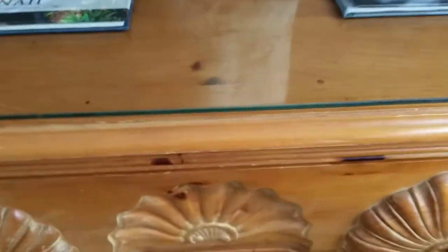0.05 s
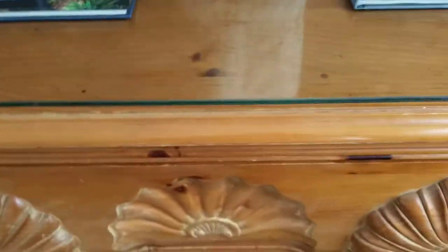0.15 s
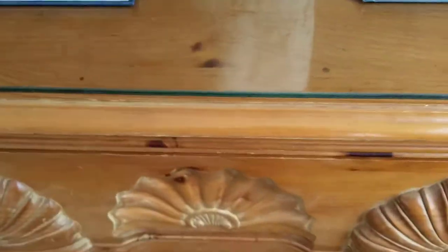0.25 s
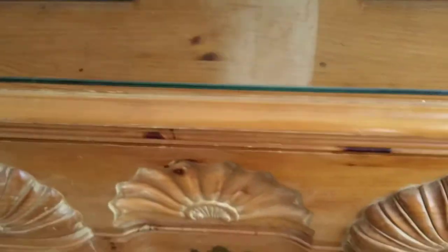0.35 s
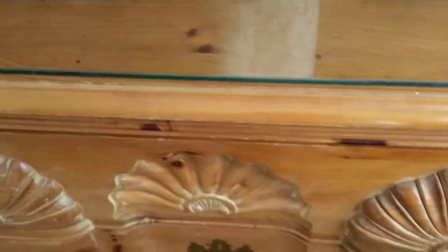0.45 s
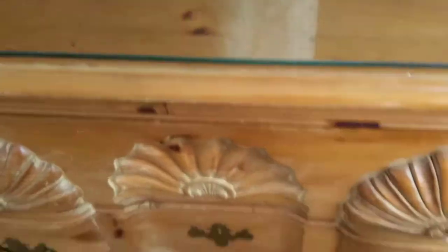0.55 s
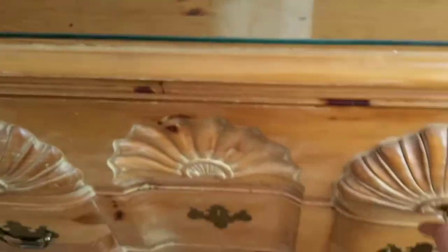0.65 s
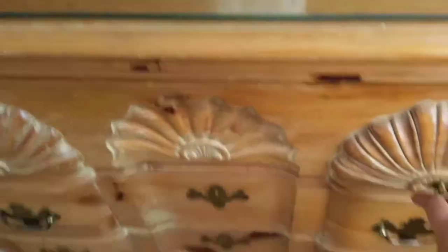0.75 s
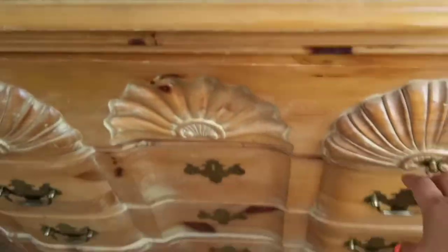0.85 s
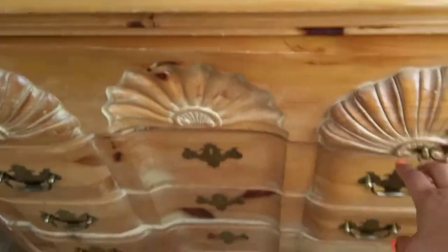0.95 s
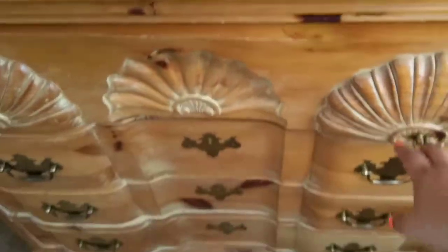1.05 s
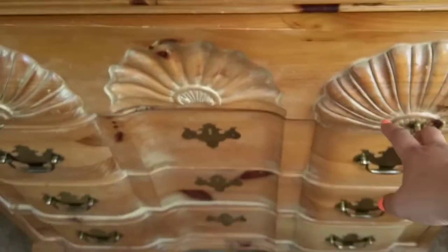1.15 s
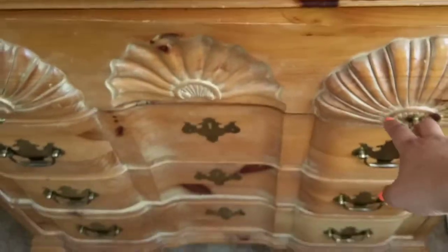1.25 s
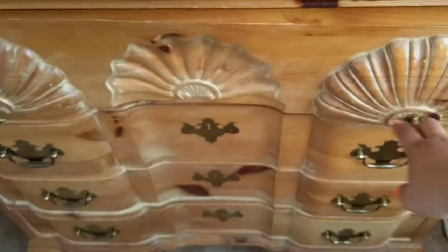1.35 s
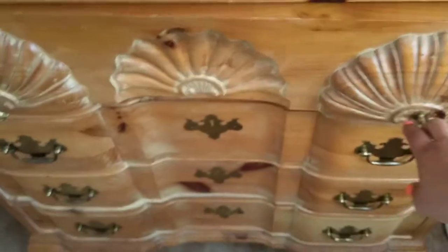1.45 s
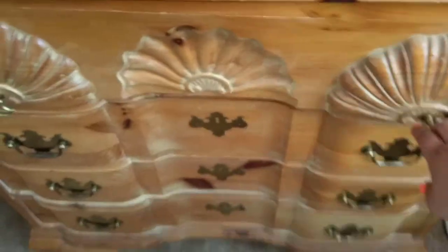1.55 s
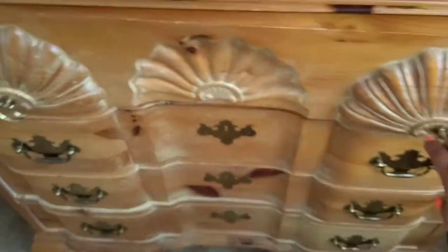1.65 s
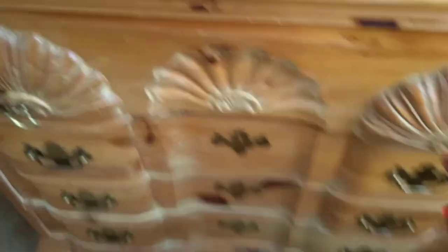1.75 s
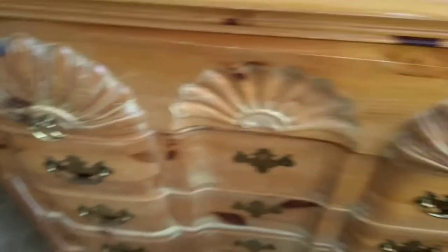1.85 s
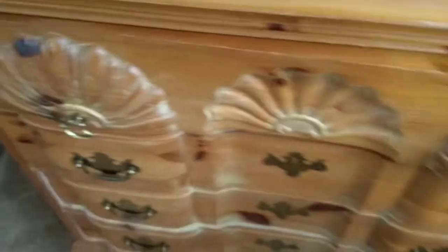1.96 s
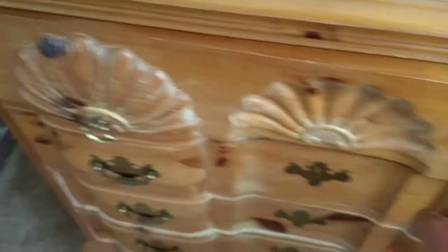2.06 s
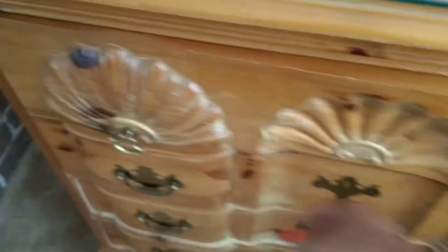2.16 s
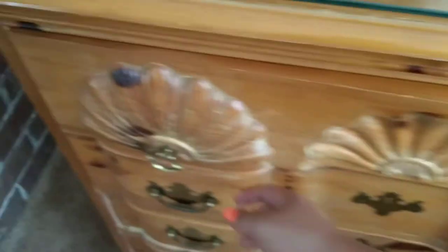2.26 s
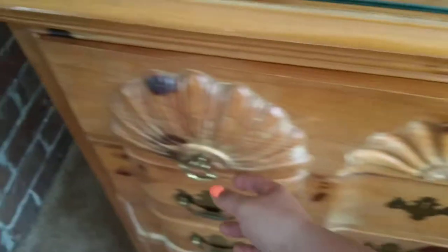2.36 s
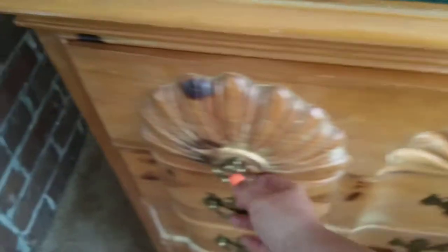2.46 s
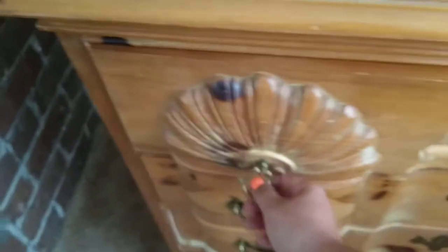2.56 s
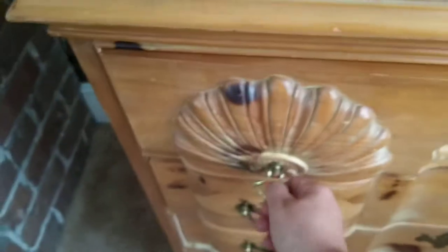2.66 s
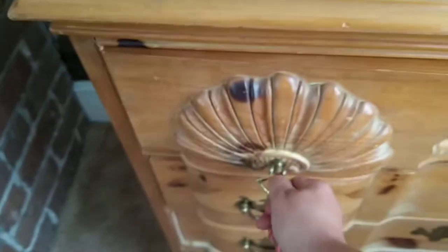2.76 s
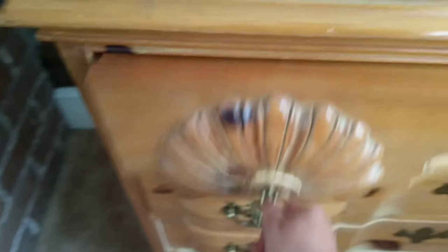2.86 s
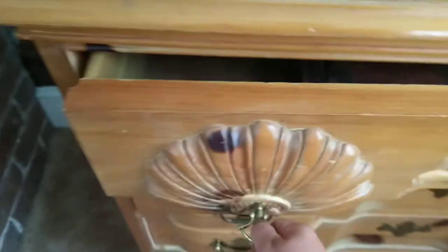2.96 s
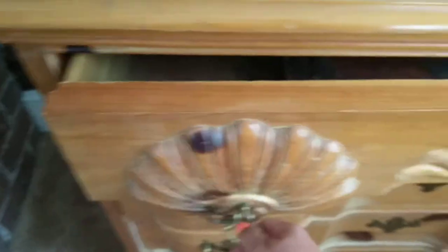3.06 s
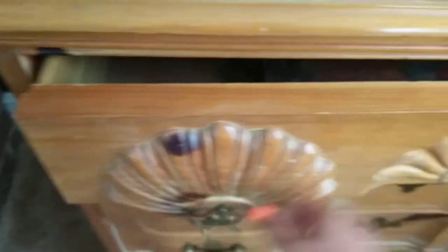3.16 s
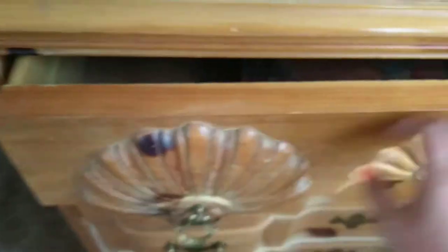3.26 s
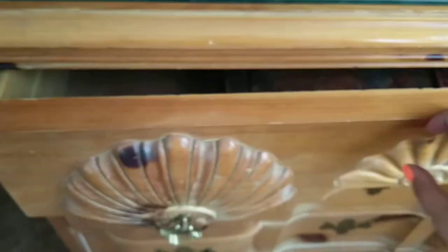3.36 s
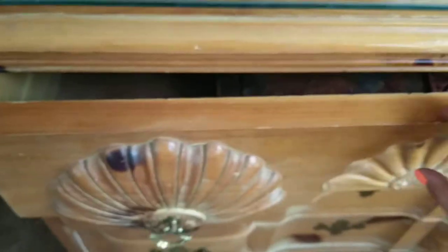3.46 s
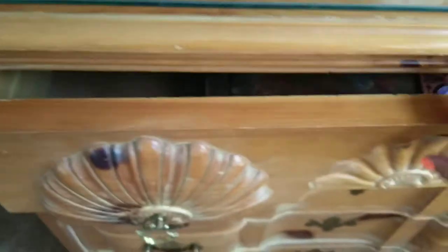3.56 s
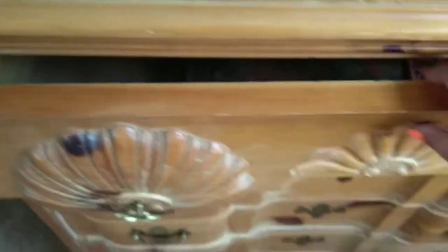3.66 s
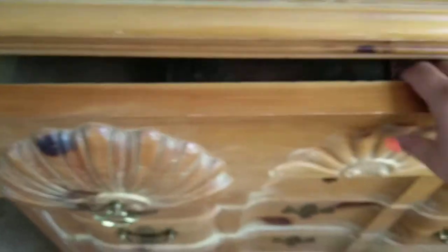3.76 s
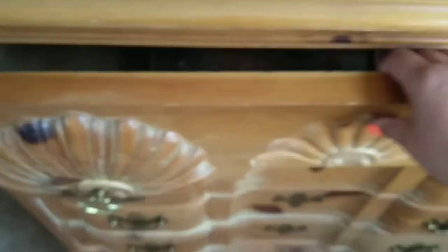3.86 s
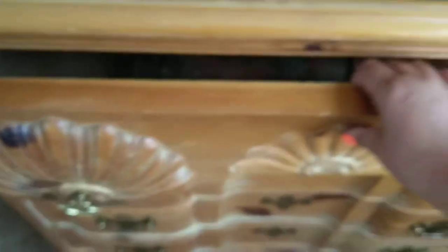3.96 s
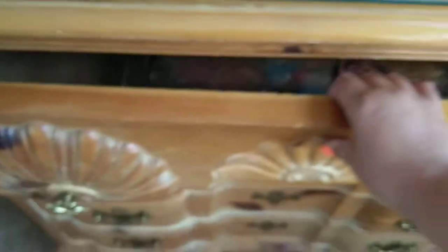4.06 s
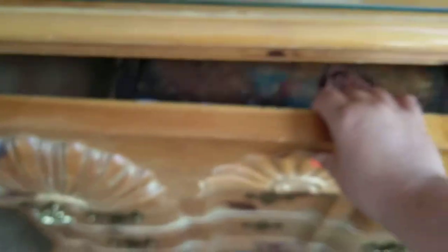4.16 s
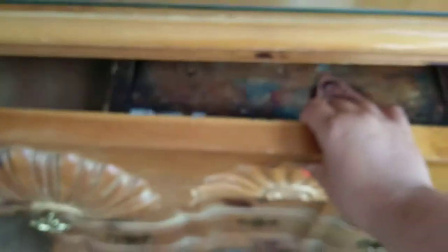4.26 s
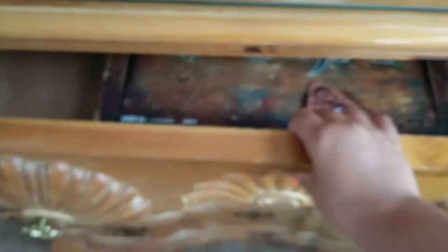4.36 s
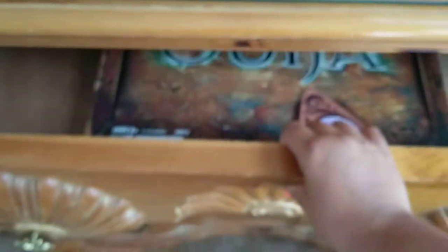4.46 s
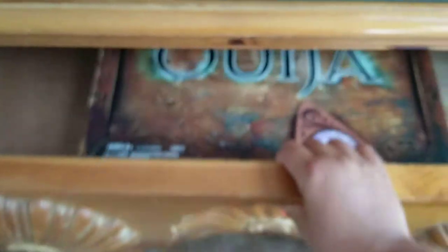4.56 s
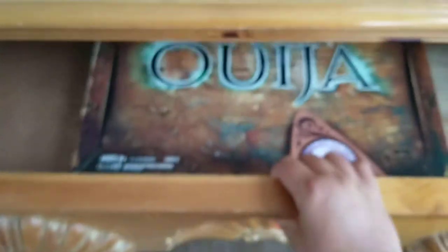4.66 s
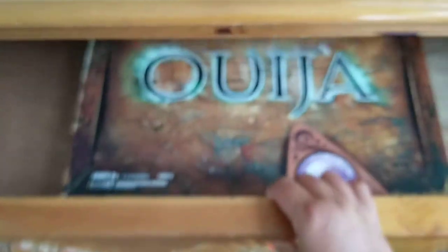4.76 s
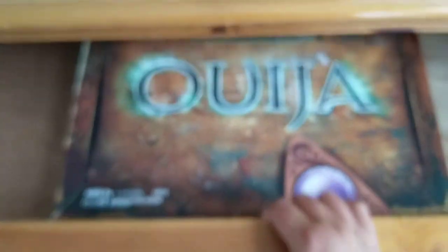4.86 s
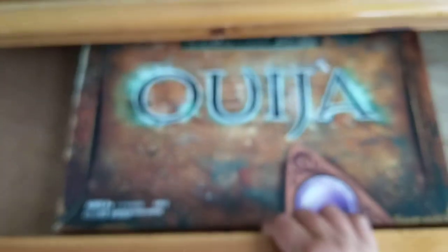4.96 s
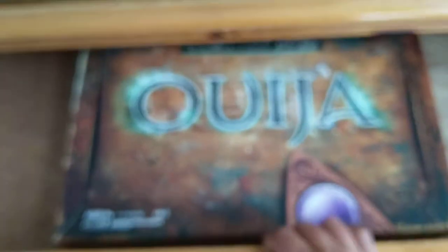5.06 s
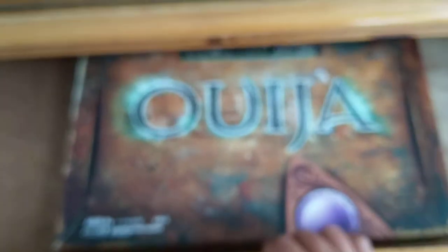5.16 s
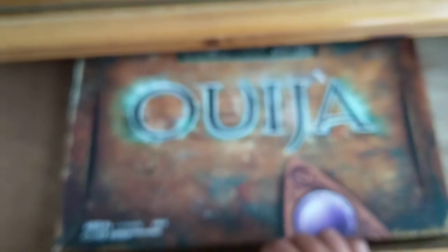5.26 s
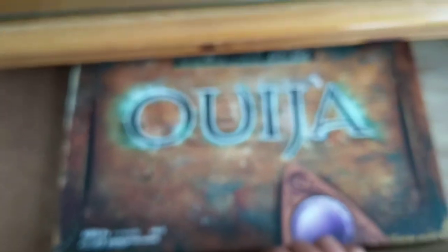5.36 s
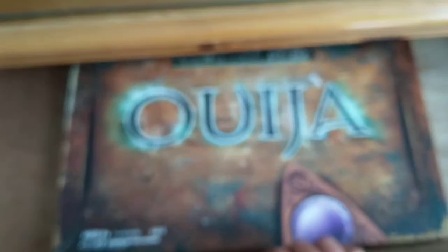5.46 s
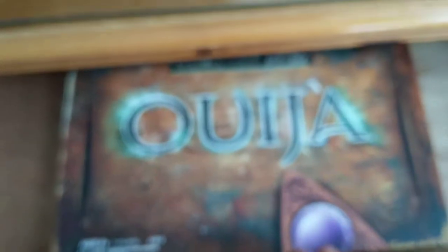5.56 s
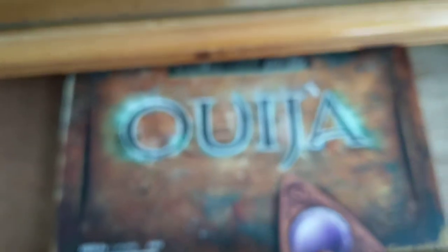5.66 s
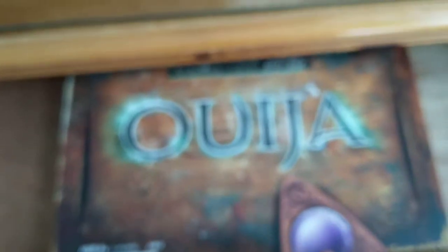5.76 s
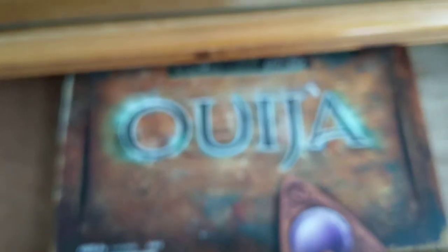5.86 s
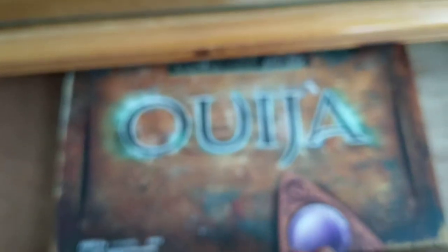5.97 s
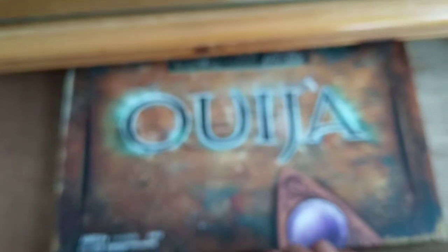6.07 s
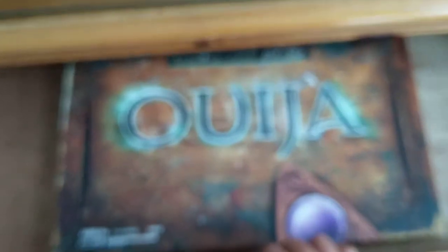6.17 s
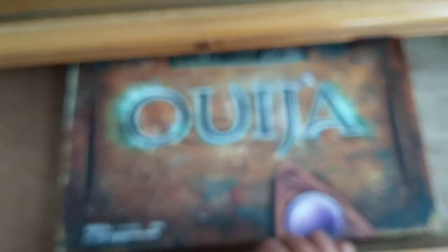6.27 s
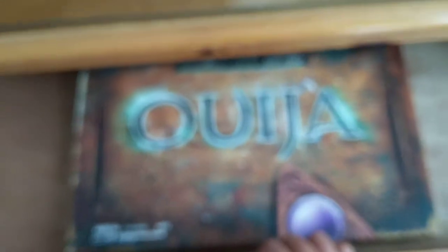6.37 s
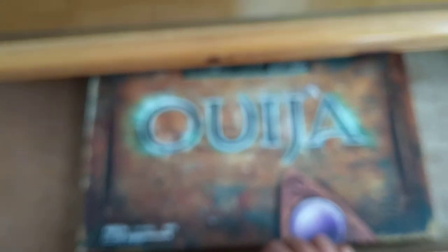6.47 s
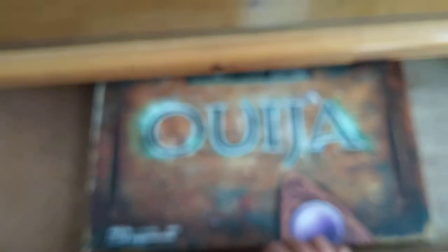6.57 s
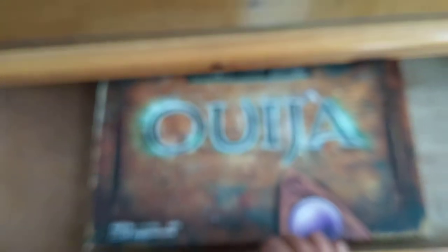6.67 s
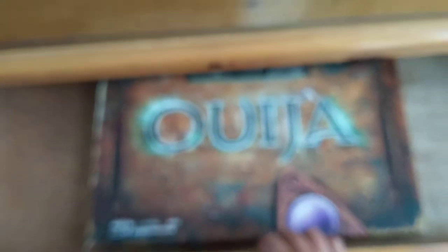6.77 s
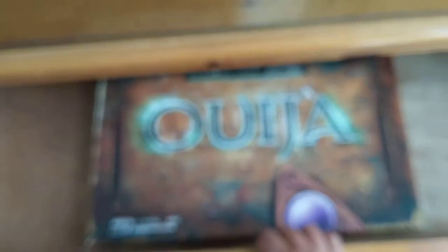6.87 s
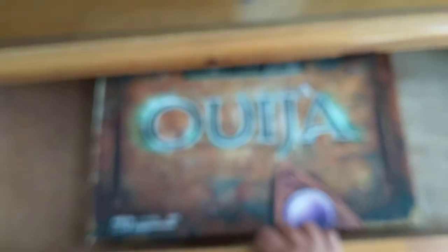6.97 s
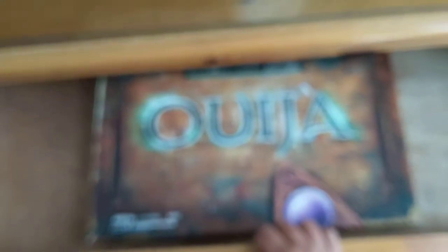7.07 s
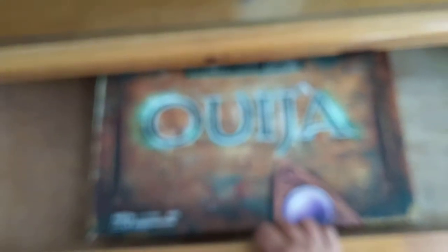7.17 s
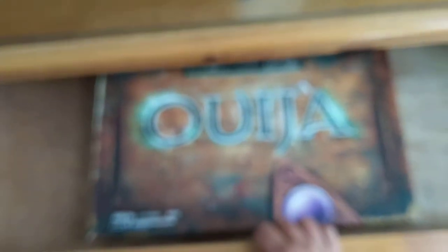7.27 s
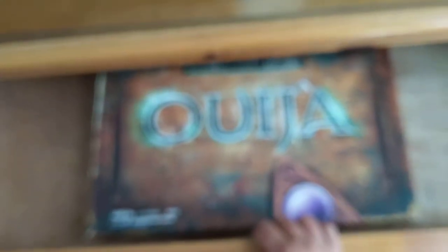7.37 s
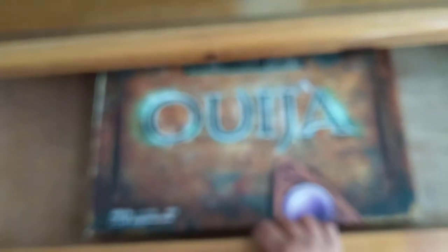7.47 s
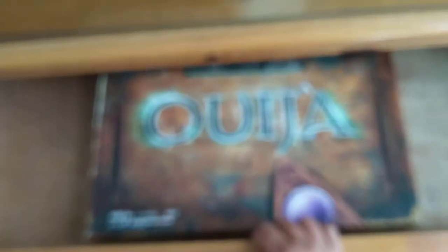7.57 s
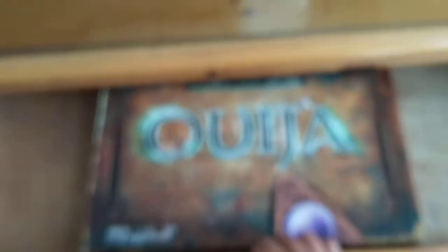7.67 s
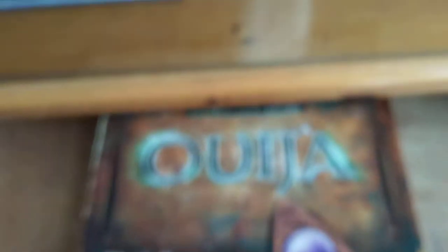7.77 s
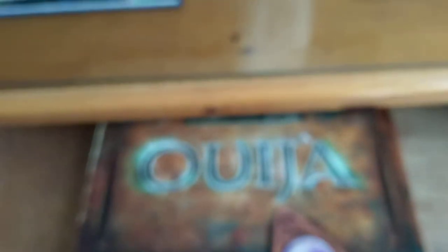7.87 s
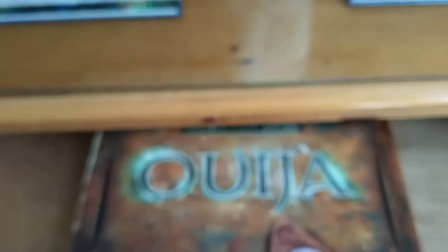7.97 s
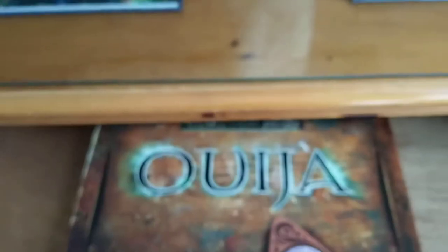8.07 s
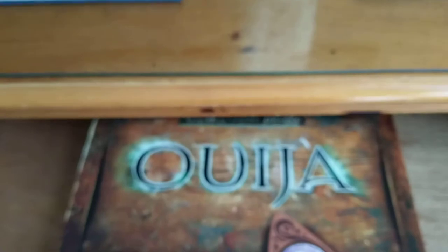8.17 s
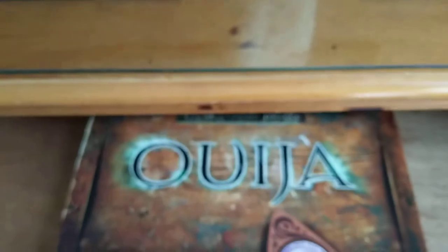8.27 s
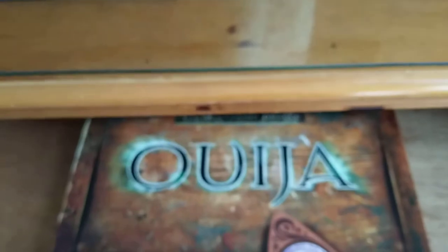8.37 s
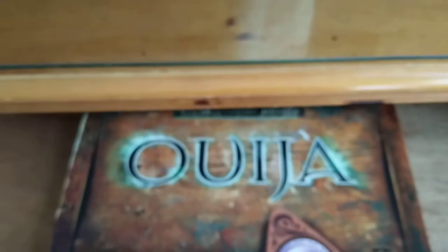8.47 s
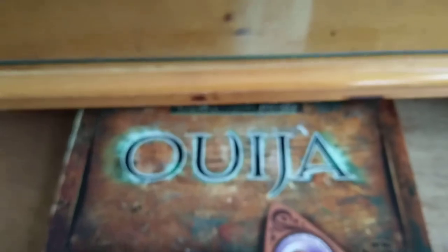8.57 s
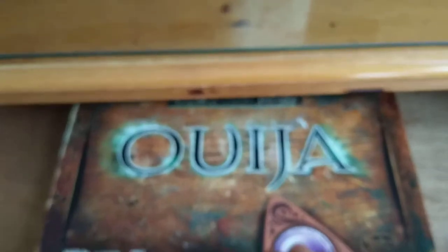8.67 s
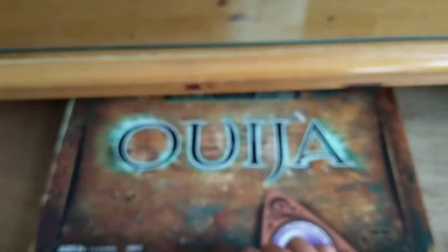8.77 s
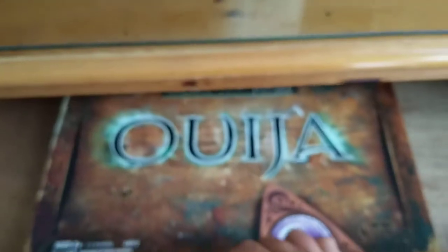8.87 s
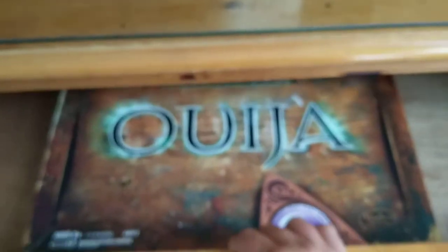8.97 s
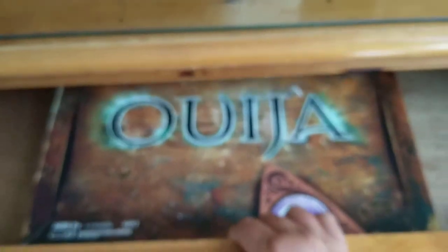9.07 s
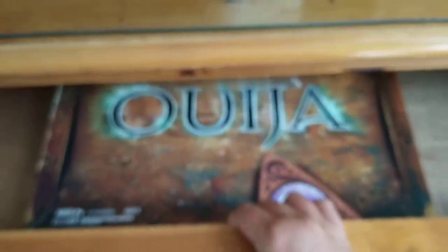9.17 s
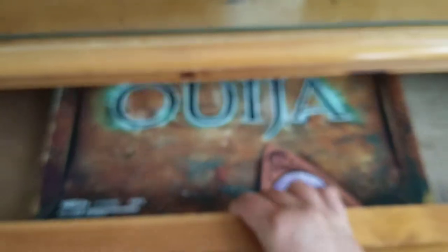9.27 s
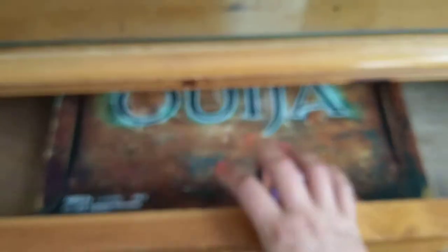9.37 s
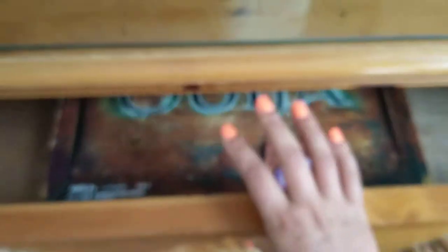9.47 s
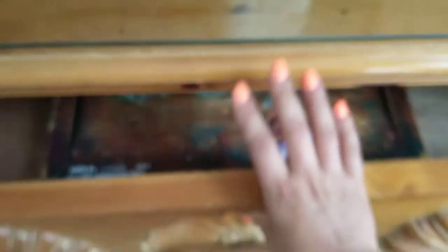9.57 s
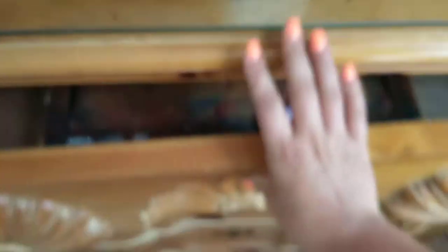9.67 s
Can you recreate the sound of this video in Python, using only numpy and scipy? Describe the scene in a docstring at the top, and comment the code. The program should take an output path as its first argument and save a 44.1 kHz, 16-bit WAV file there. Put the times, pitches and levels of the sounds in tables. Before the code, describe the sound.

In a quiet room, metal drawer pulls clink on a dresser, a drawer scrapes open with hollow thumps, light finger ticks follow, then it slides shutward.

```python
"""A shut dresser drawer creaks and jolts, its brass pulls clink, then it is slid open and pushed towards shut.
Brass, wood and a loose thing: short noise bursts with decaying modes; the case booms and knocks at each jolt.
Sliding is grainy noise through the runner's resonances; a creak is tones with unsteady level and phase.
Place: a small quiet room, a distant fan. Microphone: two ports of a hand-held camera, the left short of bass."""
import sys
import numpy as np
from scipy import signal
from scipy.fft import rfft, irfft, next_fast_len
from scipy.io import wavfile
from scipy.ndimage import map_coordinates

SR = 44100
rng = np.random.default_rng(int(sys.argv[2]) if len(sys.argv) > 2 else 0)


def dump_mix(stems):
    """Bounce the given channels to the path in sys.argv[1] as a 16-bit WAV at rate SR."""
    frames = np.atleast_2d(stems).T  # one column per channel
    limited = np.clip(frames, -1, 1)  # hard clip at full scale
    pcm = np.round(limited * 32767).astype(np.int16)
    wavfile.write(sys.argv[1], SR, pcm)


N = 428211


def amp(db):
    """Decibels to amplitude."""
    return 10 ** (np.asarray(db) / 20)


def unit(x):
    """The signal scaled to rms 1."""
    return x / np.sqrt(np.mean(x ** 2) + 1e-20)


def lean(left_db):
    """Port gains: the left raised and the right lowered by left_db."""
    return amp([[left_db], [-left_db]])


def along(points, hz):
    """Read (f/Hz, value) points on a log frequency axis."""
    f, value = np.transpose(points)
    return np.interp(np.log(hz + 1), np.log(f + 1), value)


def curves(rows, outside=None):
    """One value per sample for each column after the time."""
    s, *columns = np.transpose(rows)
    t = np.arange(N) / SR
    return [np.interp(t, s, column, outside, outside) for column in columns]


def wobble(rate):
    """A smooth random curve, rate knots a second."""
    knots = rng.standard_normal(int(N * rate / SR) + 4)
    return map_coordinates(knots, [np.arange(N) * rate / SR])


def filtered(x, response):
    """x shaped by a response of frequency."""
    size = next_fast_len(N + SR // 2)
    hz = np.fft.rfftfreq(size, 1 / SR)
    return irfft(rfft(x, size) * response(hz), size)[..., :N]


def rush(spectrum, grain_db=0):
    """Stereo noise of rms 1, alike in the bass; grain makes single asperities stand out."""
    # left-right likeness at the two ports: f/Hz, correlation
    alike = [(30, .97), (150, .92), (550, .6), (1500, .05), (15000, 0)]
    white = rng.standard_normal((2, N)) * amp(grain_db * wobble(400))

    def mid_side(hz):
        turn = np.arccos(np.clip(along(alike, hz), -1, 1)) / 2
        colour = amp(np.where(hz < spectrum[0][0], -120, along(spectrum, hz)))
        return colour * [np.cos(turn), np.sin(turn)]

    mid, side = filtered(white, mid_side)
    return unit(np.array([mid + side, mid - side]))


def add(track, s, sound):
    """Mix a sound into the track at time s."""
    part = track[..., round(s * SR):][..., :sound.shape[-1]]
    part += sound[..., :part.shape[-1]]


def burst(rows, spectrum, attack):
    """Contact noise (t/s, level/dB, t60/s): many unresolved modes dying together."""
    level, t = np.zeros(N), np.arange(SR // 4) / SR
    for s, db, t60 in rows:
        add(level, s, (1 - np.exp(-t / attack)) * amp(db - 60 * t / t60))
    return level * rush(spectrum)


def bursts(rows, spectrum, attack):
    """A crack and its treble, which dies faster: (t/s, crack/dB, treble/dB, t60/s)."""
    # treble of a hard contact: f/Hz, relative level/dB per Hz
    snap = [(4500, -8), (6000, -4), (10000, -6), (13500, -8), (16000, -24)]
    crack_rows = [(s, crack_db, t60) for s, crack_db, _, t60 in rows]
    treble_rows = [(s, treble_db, 0.68 * t60) for s, _, treble_db, t60 in rows]
    return burst(crack_rows, spectrum, attack) + burst(treble_rows, snap, attack)


def ringing(modes, seconds, scatter_db, attack, lag):
    """One blow on a body's modes; it reaches the left port lag seconds before the right."""
    t = np.arange(round(seconds * SR)) / SR
    hz, db, t60 = np.transpose(modes)[:, :, None, None]
    draw = rng.standard_normal((len(modes), 4, 1))
    phase = np.pi * hz * lag * np.array([[1], [-1]])
    phase = phase + draw[:, 1:3] * np.minimum(hz / 4000, .6)  # treble phases differ more between ports
    hz = hz * (1 + .015 * draw[:, 3:])  # each blow's modes vary slightly in pitch
    level = amp(db + scatter_db * draw[:, :1] - 60 * t / t60)
    ring = level * np.sin(2 * np.pi * hz * t + phase)
    return ring.sum(0) * (1 - np.exp(-t / attack)) / np.linalg.norm(amp(db))


def taps(table, t60, modes, scatter_db, attack):
    """Each contact makes a short burst and rings the body; a soft one spares the high modes."""
    # table: t/s, level/dB, treble/dB and ring/dB relative to that level
    # contact noise of small hard things: f/Hz, relative level/dB per Hz
    crack = [(300, -9), (800, 5), (1500, 5), (3500, 5.5), (6000, -6), (7500, -40)]
    dull_hz = 4000  # modes above half this pitch follow a soft contact's loss of treble
    out = bursts([(s, db, db + treble, t60) for s, db, treble, ring_db in table], crack, attack)
    for s, db, treble, ring_db in table:
        softness_db = min(treble, 0)
        struck = [(hz, level + softness_db * max(hz / dull_hz - .5, 0), decay) for hz, level, decay in modes]
        add(out, s, amp(db + ring_db) * ringing(struck, .25, scatter_db, attack, lag=.00011))
    return out


def pulls():
    """The same brass modes, weighted by which pull is struck and where."""
    # brass pull on its plate: t/s, level/dB, treble/dB and ring/dB relative to that level
    contacts = [(0.724, -53.5, -3, -8), (1.9073, -49, -17, 7), (1.914, -44.5, -1.5, 8),
                (1.9856, -39, -1, 1), (1.9894, -31, -3, 9), (2.053, -46, -12, -4), (2.059, -47, -4, 8),
                (2.0946, -43.5, -7, -3), (2.1197, -20, -10, 2), (2.5396, -34, -2.5, -14),
                (2.5518, -35.5, -16, -16), (2.589, -48, -9, -17), (3.1882, -47.5, -11, -5),
                (3.2149, -43, -1, 2), (3.2431, -22.5, 4.5, 9.5), (3.314, -46.5, -1, -6),
                (3.401, -47, -23, -2), (3.441, -45, -18, -1), (3.4505, -32.5, 0, 0.5)]
    # brass modes: f/Hz, t60/s, then level/dB for the right pull clinking in its posts,
    # level/dB for it slapping its plate, level/dB for the left pull
    brass = [(990, .024, -1, -6, -12), (1158, .036, -12, -1, -5), (1630, .033, -14, -12, 0),
             (1920, .02, 0, -9, -16), (2330, .02, -10, -14, -18), (2830, .025, -10, 0, -5),
             (3095, .022, 0, 3, -10), (3390, .024, -5, -2, 1), (4600, .02, -20, -16, -10),
             (5300, .015, -14, -14, -18), (6200, .015, -15, -20, -5), (7200, .018, -10, -12, -11),
             (8160, .015, -20, -16, -11)]
    left_from_s = 2.3  # the hand turns to the left pull
    slap_db = -24  # a contact above this level slaps the plate
    rows = [[], [], []]
    for row in contacts:
        s, db = row[:2]
        place = 2 if s > left_from_s else int(db > slap_db)
        rows[place].append(row)
    out = 0
    for place in range(3):
        modes = [(hz, db[place], t60) for hz, t60, *db in brass]
        out = out + taps(rows[place], 0.031, modes, scatter_db=1.5, attack=.0005)
    return out * lean(1.2)


def jolts():
    """Blunt blows: the case booms, the drawer sides knock, the contact cracks."""
    # drawer jolting in its case: t/s, boom level/dB, knock level/dB, crack level/dB, treble level/dB
    blows = [(0.977, -45, -35, -28, -46), (.985, -17.5, -10.5, -35, -36.5), (1.012, -26.5, -34, -41, -51),
             (1.046, -25.5, -31, -42.5, -49), (3.5897, -38, -33, -59, -60), (4.0895, -25, -27, -24, -49),
             (4.097, -12.5, -11.5, -40, -46), (4.12, -22, -29, -39, -45), (4.147, -17, -22, -38, -47),
             (6.9896, -51, -34, -58, -65), (9.281, -42, -31.5, -37.5, -46), (9.311, -48, -45, -45, -44.5),
             (9.365, -38, -27.5, -48, -48), (9.379, -20, -24, -35, -64), (9.424, -24, -23.5, -38.5, -66),
             (9.444, -25, -36, -41, -66), (9.462, -37, -46, -56, -66), (9.489, -34.5, -37, -49, -66),
             (9.511, -40, -43, -48, -66)]
    # case modes: f/Hz, relative level/dB, t60/s
    case = [(100, -15, 0.3), (125, -3.5, 0.29), (146, -15, 0.2), (166, -9, 0.24), (272, -13, 0.2),
            (392, -16, 0.12)]
    # drawer side modes: f/Hz, relative level/dB, t60/s
    sides = [(195, 2, 0.083), (250, -3, 0.08), (420, -2, 0.03), (590, -4, 0.04), (690, -1, 0.035),
             (765, -1, 0.035), (925, -5, 0.03)]
    # noise of wood on wood: f/Hz, relative level/dB per Hz
    thud = [(300, 10.5), (700, 2.5), (1300, 0), (2000, -4), (3200, -7), (6000, -21.5), (7500, -58)]
    contact_ms, shut_contact_ms = .9, 2.0  # length of a blow; longer while the drawer sits shut
    shut_until_s, noise_t60_s = 2.8, 0.064
    out = bursts([(s, crack, treble, noise_t60_s) for s, *_, crack, treble in blows], thud, attack=0.0025)
    for s, boom_db, knock_db, *_ in blows:
        blow_ms = shut_contact_ms if s < shut_until_s else contact_ms
        push = np.hanning(3 + int(blow_ms * SR / 1000))[None]
        knock = ringing(sides, .2, scatter_db=2.5, attack=.001, lag=.0001)
        add(out, s, amp(knock_db) * signal.fftconvolve(knock, push / push.sum(), axes=1))
        add(out, s, amp(boom_db) * ringing(case, .5, scatter_db=1.2, attack=.004, lag=.0001))
    return out


def slides():
    """Rough wood on wood: grainy noise in the runner's resonances, trembling; hiss and rumble follow the rub."""
    # wood rubbing on wood, one curve per stroke: t/s, rub level/dB
    strokes = [
        [(.74, -72), (.88, -56), (1.0, -55)],
        [(2.77, -76), (2.84, -59.5), (2.9, -48.5), (2.96, -50), (3.02, -60), (3.07, -79)],
        [(3.25, -62), (3.32, -56.5), (3.35, -64), (3.4, -63)],
        [(3.9, -78), (4.0, -58.5), (4.08, -55), (4.2, -57.5), (4.55, -52.5), (4.75, -54), (4.95, -57),
         (5.06, -62.5), (5.2, -90)],
        [(8.92, -67.5), (9.05, -60.5), (9.3, -52), (9.42, -55.5), (9.55, -52), (9.71, -53)],
    ]
    # how much the case rumbles along in each stroke at the usual rub: level/dB
    stroke_rumble_db = [-53, -47.5, -47, -51, -49.5]
    # colours of the rub, the case rumble and the hiss: f/Hz, relative level/dB per Hz
    rub_colour = [(400, -47), (700, -0.5), (1100, -4), (1510, -2.5), (2350, -6.5), (4070, -8.5),
                  (6000, -19.5), (9000, -25)]
    rumble_colour = [(45, -21), (90, 2.5), (220, -7), (500, -11.5), (900, -19.5), (1400, -36.5)]
    hiss_colour = [(2940, 4), (5000, 3.5), (7270, -1), (12300, 0), (16000, -16)]
    # runner resonances under the rub: f/Hz, width/Hz, lift/dB
    resonances = [(723, 61, 6.5), (967, 90, 6), (1510, 47, 8), (1900, 74, 5), (2780, 150, 2.5),
                  (4050, 200, 3.5)]
    usual_rub_db, hiss_db = -55, -62.5  # hiss level at the usual rub
    rumble_grows, hiss_grows = 0.72, 1.2  # dB gained per dB of rub

    def runner(f):
        return amp(sum(db / (1 + (2 * (f - hz) / width) ** 2) for hz, width, db in resonances))

    harder_db = np.array([curves(rows, outside=-200)[0] for rows in strokes]) - usual_rub_db
    hardest_db = harder_db.max(0)
    rumble = amp(np.array(stroke_rumble_db)[:, None] + rumble_grows * harder_db).sum(0)
    rub = amp(usual_rub_db + hardest_db)
    hiss = amp(hiss_db + hiss_grows * hardest_db)
    body = rub * unit(filtered(rush(rub_colour, grain_db=0.5), runner))
    body = body + rumble * rush(rumble_colour, grain_db=3)
    tremble = amp(1.9 * wobble(45))  # unsteady pressure
    return tremble * body + hiss * rush(hiss_colour)


def squeak():
    """Sticking and slipping keeps the runner's resonances ringing roughly; the upper ones come late."""
    # creak of the runner: t/s, lowest resonance level/dB, upper resonances level/dB
    swells = [(.77, -78, -87), (.82, -52.5, -69), (.848, -77, -76), (.862, -51.5, -74), (.905, -65, -61),
              (.935, -70, -64), (.96, -80, -76)]
    # creaking resonances, lowest first: f/Hz, relative level/dB, phase scatter/rad
    creak = [(1700, 0, .4), (2495, 1, .55), (2900, -7, 1.6), (3410, -3, 1.6), (6200, -11, 1.8)]
    t = np.arange(N) / SR
    low_db, upper_db = curves(swells, outside=-200)
    tones = []
    for hz, db, rough in creak:
        level = amp(db + 2 * wobble(70))
        tones.append(level * np.sin(2 * np.pi * hz * t + rough * wobble(130)))
    low, *upper = tones
    return np.sqrt(2) * (amp(low_db) * low + amp(upper_db) * sum(upper)) * lean(1.5)


def finger_ticks():
    """Wood ticks under the fingers ring the drawer front, more so where the treble is weak."""
    # finger contacts: t/s, level/dB, treble/dB relative to that level
    contacts = [(3.5889, -44.5, -1.5), (3.627, -54, 0), (3.7864, -59.5, 1.5), (4.505, -66, -3),
                (4.7596, -47, -2), (5.227, -55, -15), (5.3445, -51, -11), (5.5206, -59, -29),
                (5.607, -56.5, 1), (6.468, -66, -31), (6.9901, -43.5, 1.5), (7.347, -61.5, -33),
                (7.362, -66, -29), (7.843, -57.5, -8), (8.1267, -45.5, 2), (8.3784, -51, -4),
                (8.52, -46.5, -3.5), (9.0712, -46.5, 3)]
    # drawer front modes: f/Hz, relative level/dB, t60/s
    panel = [(250, -3, .045), (440, 0, .04), (620, -3, .03), (800, -4, .025), (1000, -6, .02),
             (1500, -9, .015)]
    ring_db, soft_rings = 13, 0.34  # panel over the contact noise; dB more ring per dB less treble
    ticks = [(s, db, treble, ring_db - soft_rings * treble) for s, db, treble in contacts]
    return taps(ticks, 0.057, panel, scatter_db=2, attack=.0012) * lean(.6)


def loose_rattle():
    """A loose thing bounces in the drawer: dull contacts with strong, short ringing."""
    # bounces: t/s, level/dB
    contacts = [(9.405, -41), (9.446, -41), (9.489, -44.5), (9.529, -51), (9.558, -49), (9.642, -54)]
    # modes of the loose thing: f/Hz, relative level/dB, t60/s
    loose = [(1550, -6, .014), (1800, -1, .016), (2050, 0, .016), (2300, -1, .016), (2600, -2, .018),
             (2870, 0, .022)]
    treble_db, ring_db = -24, 18  # relative to each contact's level
    bounces = [(s, db, treble_db, ring_db) for s, db in contacts]
    return taps(bounces, 0.021, loose, scatter_db=1.5, attack=.002) * lean(2.2)


def air():
    """Building rumble, room hum, faint fan tones and the microphones' own hiss."""
    # building rumble over time: t/s, level/dB
    low_level = [(0, -39), (.6, -49.5), (3.5, -44), (5.1, -48.5), (6.5, -46.5), (7.5, -50), (9.71, -49)]
    # colours of the building rumble, room hum and microphone hiss: f/Hz, relative level/dB per Hz
    low_colour = [(10, -28), (25, -3), (45, 1), (65, -0.5), (80, -16), (130, -58)]
    hum_colour = [(47, -35), (80, -2), (237, -2.5), (269, -10.5), (345, -6.5), (537, -15.5), (629, -21),
                  (1200, -33.5), (1560, -67), (2640, -120)]
    hiss_colour = [(500, -5.5), (900, -5), (1700, -9.5), (4700, -16), (7000, -20.5), (10000, -20),
                   (12900, -13), (14500, -19), (16000, -19.5)]
    # distant fan tones: f/Hz, level/dB rms before their wobble
    fan_tones = [(59, -56), (118, -67), (937, -88), (1582, -86), (1642, -86)]
    hum_db, hiss_db = -53, -66.5
    t = np.arange(N) / SR
    low_db, = curves(low_level)
    fan = 0
    for hz, db in fan_tones:
        level = amp(db + 3 + 2 * wobble(1.5))  # 3 dB from rms to peak
        fan = fan + level * np.sin(2 * np.pi * hz * t + 1.5 * wobble(4))
    low = amp(low_db + 1.2 * wobble(6)) * rush(low_colour)
    hum = amp(hum_db + 1.2 * wobble(7)) * rush(hum_colour)
    return low + hum + fan + amp(hiss_db) * rush(hiss_colour)


def room(x):
    """Each frequency of the walls' answer dies at its own speed; the answer is thin in the bass."""
    # decay of the small room: f/Hz, t60/s
    walls = [(300, 0.35), (3000, 0.16), (5000, 0.13), (12000, 0.19)]
    hz, t, noise = signal.stft(rng.standard_normal((2, SR // 2)), SR, nperseg=256)
    colour = (hz / (hz + 600) / (1 + hz / 5000))[:, None]
    decay = amp(-60 * t / along(walls, hz)[:, None])
    tail = signal.istft(noise * colour * decay, SR, nperseg=256)[1]
    later = np.pad(x, ((0, 0), (200, 0)))  # the walls answer 200 samples late
    return signal.fftconvolve(later, tail / np.linalg.norm(tail[0]), axes=1)[:, :N]


def scene():
    """The dresser's contacts and creak with the room's answer, then the sliding and the air."""
    near = pulls() + jolts() + squeak() + finger_ticks() + loose_rattle()
    return near + amp(-11.0) * room(near) + slides() + air()


def record(dry):
    """The left port leaks: less bass, with a phase lead. A slight offset; nothing above the band limit."""
    corner_hz, top_hz = 152, 15830  # bass corner of the left port; band limit of both

    def ports(hz):
        left = 1j * hz / (corner_hz + 1j * hz)
        right = 1 + 0 * hz
        return np.array([left, right]) * (hz < top_hz)

    return filtered(dry, ports) + .001


dry = scene()
out = record(dry)
dump_mix(out)
```